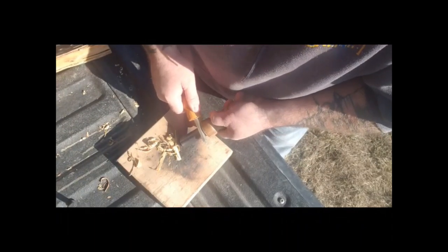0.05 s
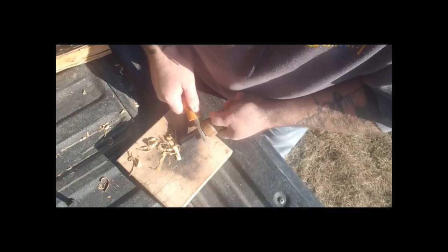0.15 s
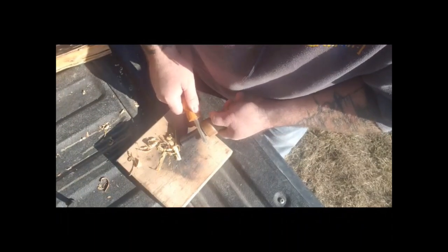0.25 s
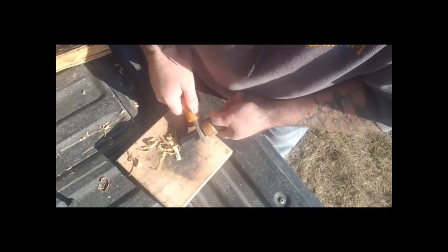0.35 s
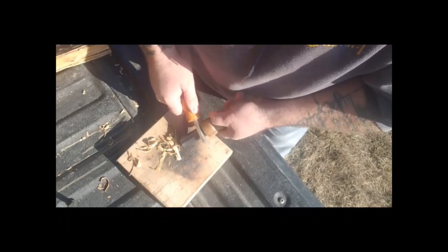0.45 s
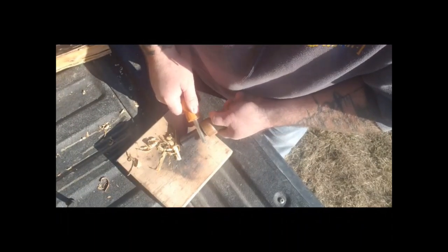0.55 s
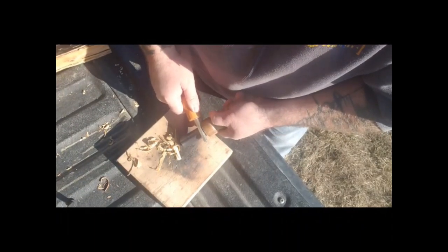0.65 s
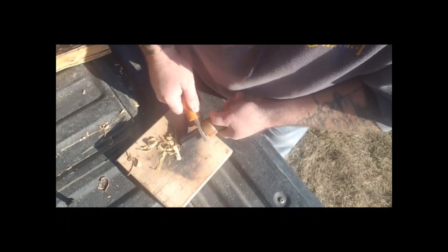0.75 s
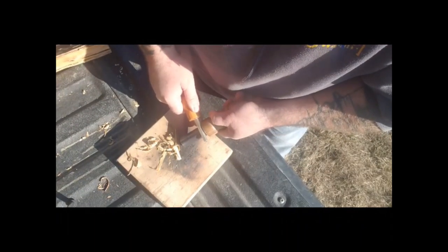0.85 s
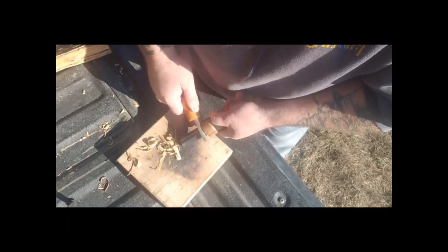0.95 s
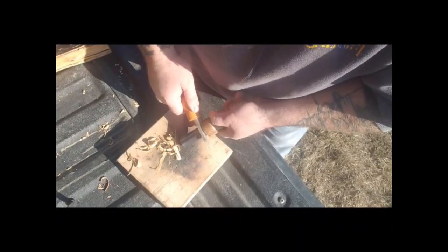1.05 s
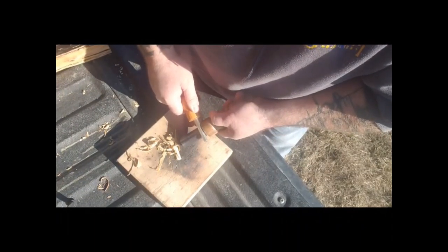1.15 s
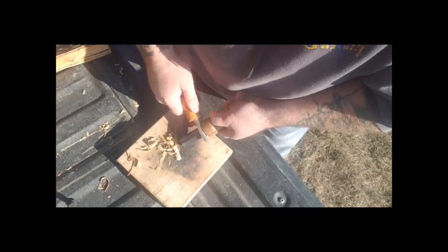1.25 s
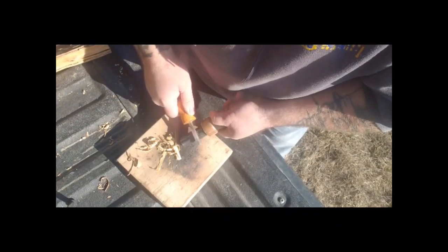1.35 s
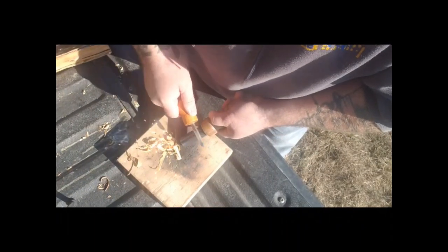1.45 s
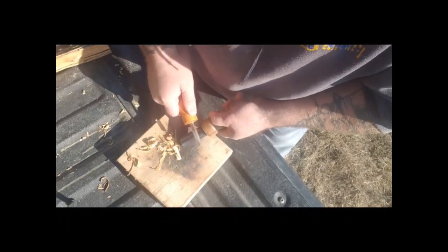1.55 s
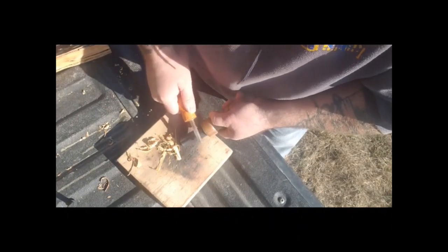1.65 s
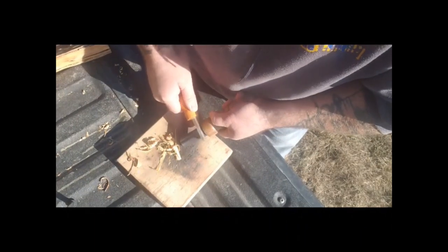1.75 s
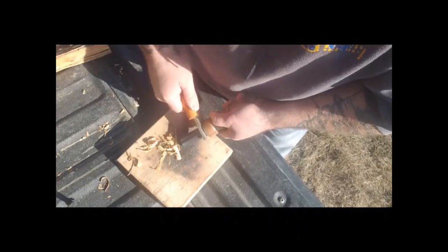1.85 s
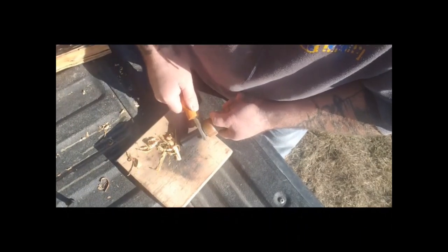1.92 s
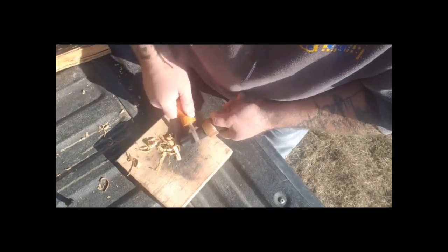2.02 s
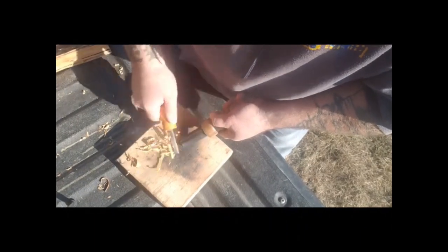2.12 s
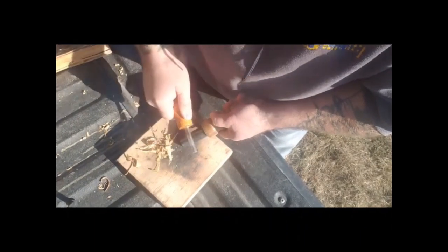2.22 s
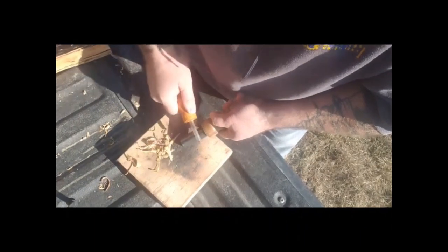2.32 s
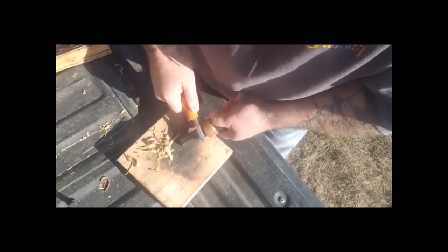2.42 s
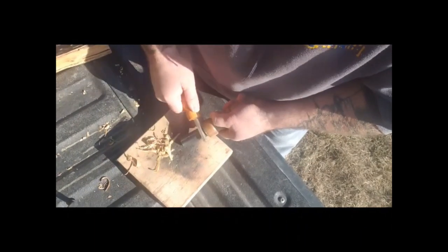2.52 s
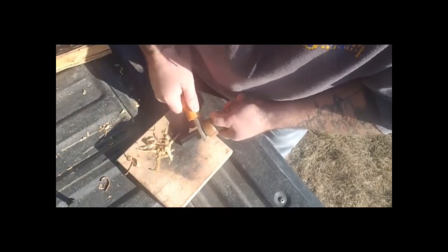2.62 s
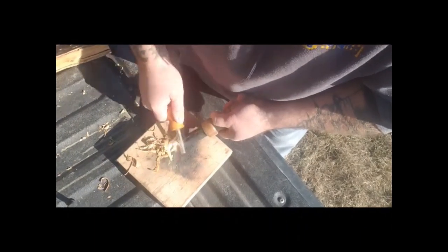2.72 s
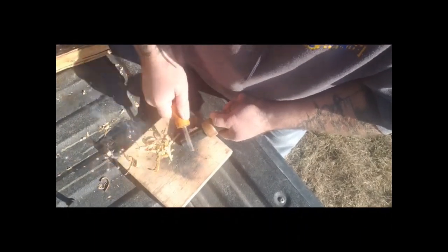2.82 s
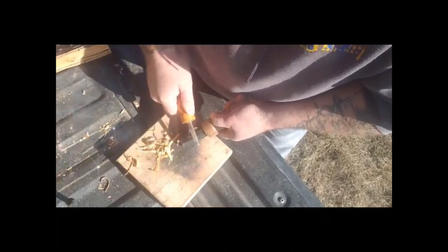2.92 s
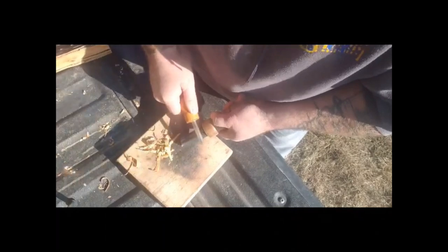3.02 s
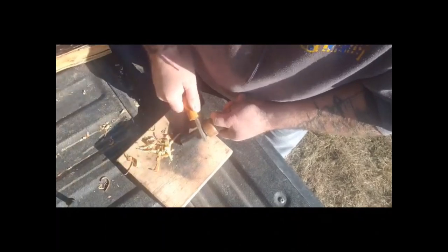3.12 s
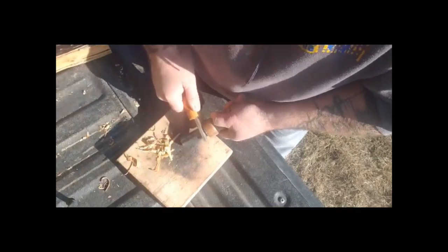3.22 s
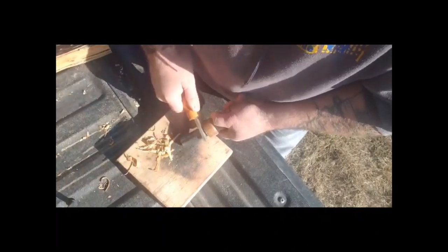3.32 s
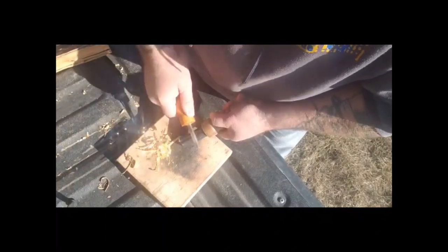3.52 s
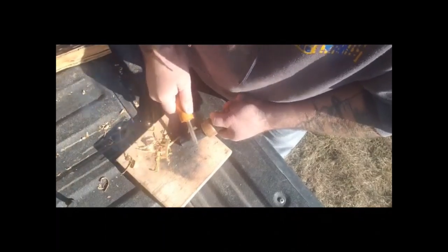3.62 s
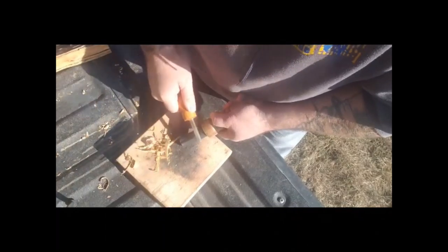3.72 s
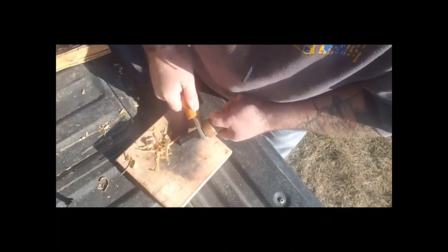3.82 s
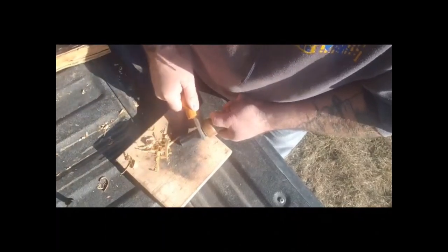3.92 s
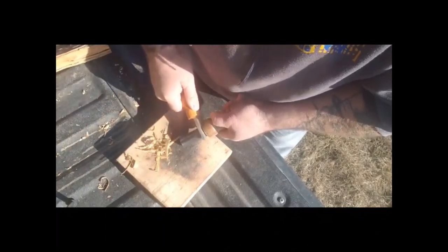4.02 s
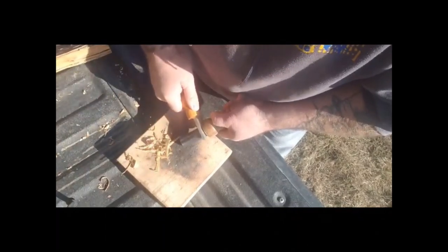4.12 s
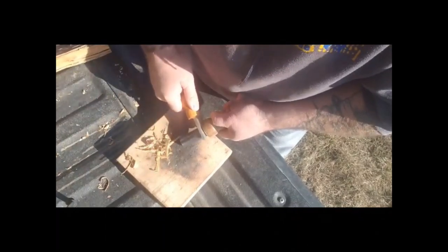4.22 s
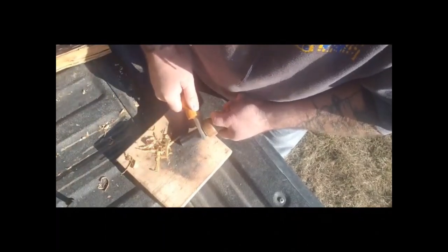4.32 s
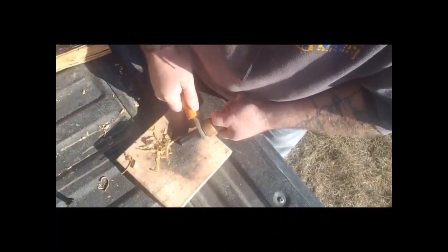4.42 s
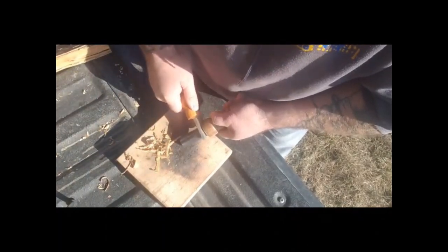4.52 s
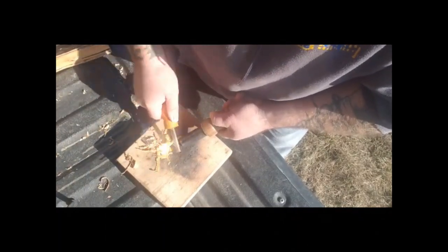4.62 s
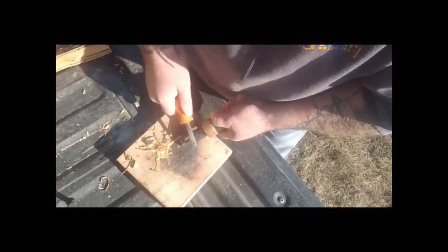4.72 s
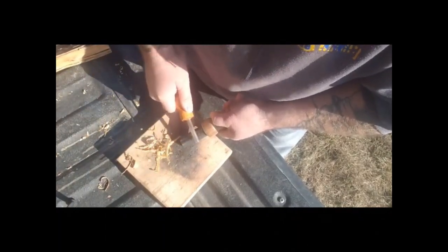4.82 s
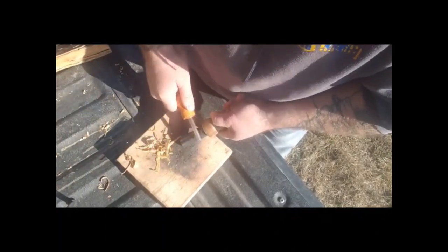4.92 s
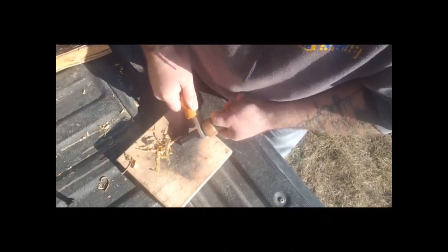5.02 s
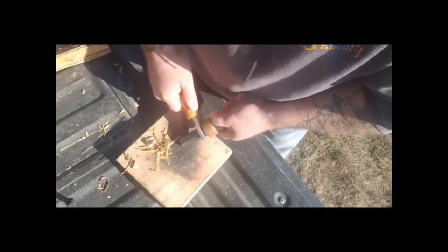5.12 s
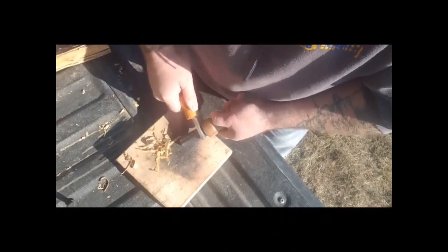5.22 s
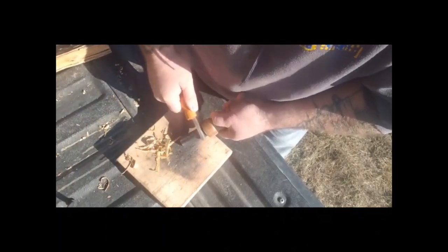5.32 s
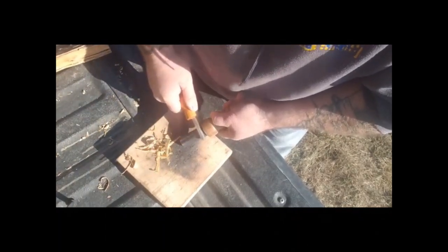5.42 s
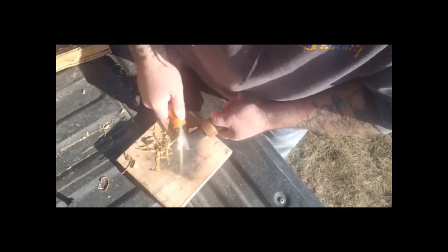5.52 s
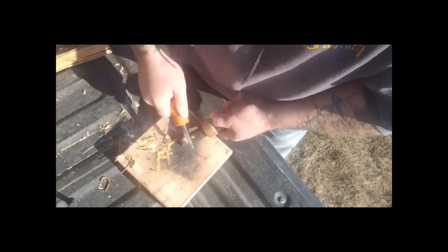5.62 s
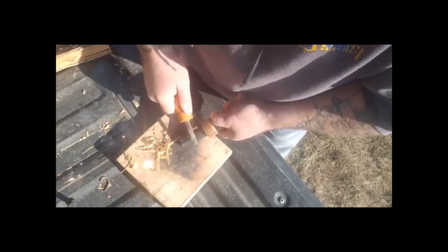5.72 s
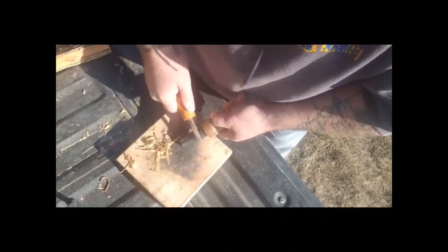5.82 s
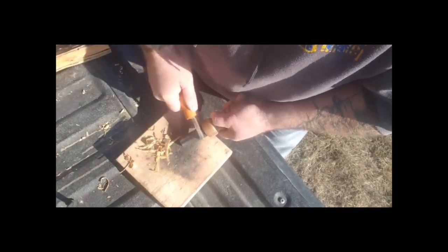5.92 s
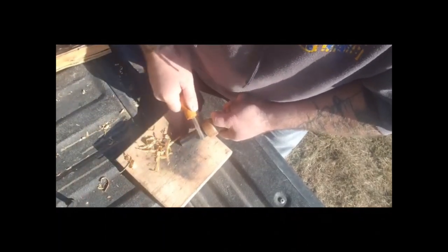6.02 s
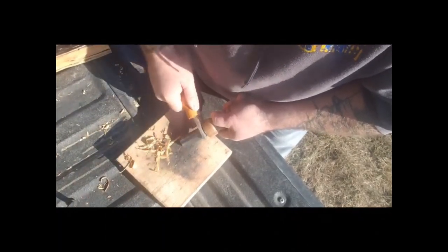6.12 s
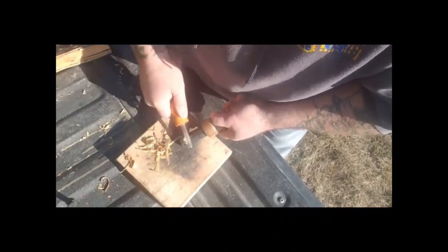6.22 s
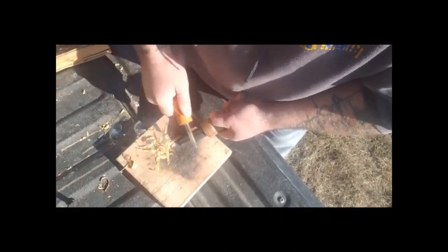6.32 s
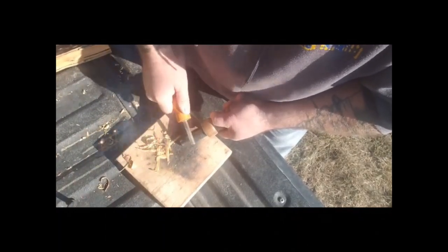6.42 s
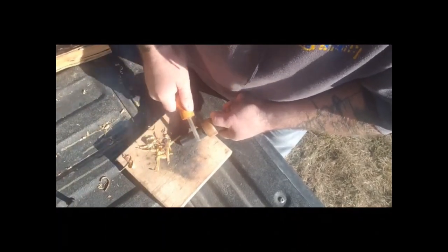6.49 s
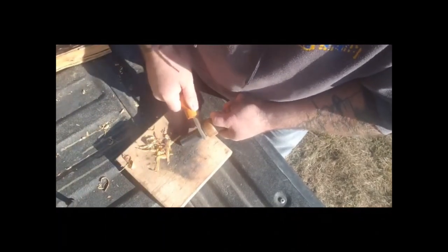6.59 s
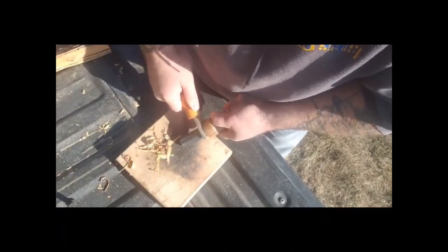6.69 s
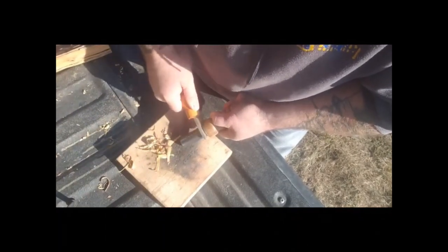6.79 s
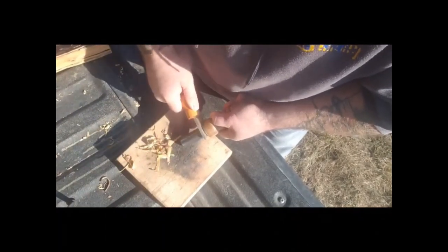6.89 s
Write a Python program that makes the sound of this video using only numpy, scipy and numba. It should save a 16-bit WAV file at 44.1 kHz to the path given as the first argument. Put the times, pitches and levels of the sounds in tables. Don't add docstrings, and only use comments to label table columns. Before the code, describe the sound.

A steel striker rasps down a spark rod in seven short strokes, each with a knock, low boom and fizzing, crackling sparks, outdoors in wind.

```python
import sys
import numpy as np
from scipy import signal
from scipy.fft import rfft, irfft, next_fast_len
from scipy.io import wavfile
from scipy.ndimage import uniform_filter1d, map_coordinates
from numba import njit

SR = 44100
rng = np.random.default_rng(int(sys.argv[2]) if len(sys.argv) > 2 else 0)


def invert_db(level):
    return 10 ** (np.asarray(level, dtype=float) / 20)


def to_wav(sig):
    pcm = np.clip(np.atleast_2d(sig), -1, 1) * 32767
    pcm = np.round(pcm).astype(np.int16)
    wavfile.write(sys.argv[1], SR, pcm.T)


N = 306495
T = np.arange(N) / SR


def unit(x):
    return x / np.sqrt(np.mean(x ** 2))


def played(tables, column, off):
    out = np.full(N, float(off))
    top = np.full(N, -200.)
    for rows in tables:
        rows = np.array(rows)
        rows[:, 0] = np.maximum.accumulate(rows[:, 0])
        on = np.flatnonzero((T >= rows[0, 0]) & (T <= rows[-1, 0] + .03))
        db = np.interp(T[on], rows[:, 0], rows[:, 1])
        leads = db > top[on]
        out[on[leads]] = np.interp(T[on[leads]], rows[:, 0], rows[:, column])
        top[on[leads]] = db[leads]
    return out


def gain(tables):
    return uniform_filter1d(invert_db(played(tables, 1, -200)), size=130)


@njit
def svf(x, hz, width):
    y, b, l = np.empty(len(x)), 0., 0.
    for i in range(len(x)):
        g, k = np.tan(np.pi * hz[i] / SR), width[i] / hz[i]
        v = (b + g * (x[i] - l)) / (1 + g * (g + k))
        b, l, y[i] = 2 * v - b, l + 2 * g * v, k * v
    return y


def band(x, hz, width_hz):
    return svf(x, hz + np.zeros(N), width_hz + np.zeros(N))


def twice(x, hz, width_hz, second_width_hz):
    return unit(band(band(x, hz, width_hz), hz, second_width_hz))


def colour(x, points):
    hz, db = np.transpose(points)
    size = next_fast_len(N, True)
    f = np.maximum(np.fft.rfftfreq(size, 1 / SR), 1)
    return irfft(rfft(x, size) * invert_db(np.interp(np.log(f), np.log(hz), db)), size)[:N]


def ring(x, modes):
    out = 0
    for hz, db, t60 in modes:
        pole = np.exp(2j * np.pi * hz / SR - np.log(1000) / (t60 * SR))
        out = out + invert_db(db) * signal.lfilter([1], [1, -pole], x).imag
    return out


def walk(rate):
    k = int(SR / rate)
    held = np.repeat(rng.standard_normal(N // k + 1), k)
    return unit(uniform_filter1d(uniform_filter1d(held, k), k)[:N])


def grit(rate, spread_db):
    chance = rng.random((3, N))
    sign = np.sign(chance[1] - .5)
    return (chance[0] < rate / SR) * sign * invert_db(-spread_db * np.log(1 - chance[2]))


def bursts(times, peaks_db, t60s):
    out = np.zeros(N)
    for s, db, t60 in zip(times, peaks_db, t60s):
        i = int(s * SR)
        tail = T[:min(N - i, SR // 4)]
        out[i:i + len(tail)] += invert_db(db - 60 * tail / max(t60, .002))
    return out


def ports(x, other, alike, lag, pan_db):
    alike = np.clip(alike, 0, 1)
    late = map_coordinates(x, [np.arange(N) - lag], order=3, mode="nearest")
    right = alike * x + np.sqrt(1 - alike ** 2) * other
    return np.array([late * invert_db(pan_db / 2), right * invert_db(-pan_db / 2)])


CALM_DB = -84
# start in seconds, rumble in dB, length in seconds, flutter against the
# rumble in dB, left minus right in dB.
GUSTS = [(0.0, -63.5, 1, -10, -25), (0.155, -43.5, 0.52, -11.5, -15.5), (0.408, -35, 0.15, -16, 0),
         (0.585, -40.5, 0.34, -14, 6.5), (0.787, -37, 0.073, -10, -1), (0.891, -54, 0.12, -5, -21),
         (1.085, -36, 0.081, -12, 2), (1.19, -49.5, 0.2, -3.5, -8.5), (1.783, -64.5, 0.23, -8, -23),
         (1.904, -48, 0.13, -7.5, -10), (2.435, -57.5, 0.13, -4.5, -23), (2.578, -48, 0.099, -27, -21),
         (3.053, -76, 0.28, -5, -27), (3.337, -49, 0.061, -13, -4.5), (3.442, -58.5, 0.098, -19, -24),
         (3.83, -55.5, 0.26, -11.5, -5.5), (4.257, -59, 0.17, -11, 2), (4.442, -49.5, 0.12, -12, -11.5),
         (4.942, -58, 0.25, -6.5, -7), (5.307, -67, 0.17, 0, -3), (5.91, -52, 0.078, -26, 0),
         (6.044, -56.5, 0.32, -7.5, -1), (6.497, -50, 0.21, -16, 2), (6.645, -47.5, 0.28, -28, 1)]


def gusts():
    rise_s, fade_db, lull_s, lull_db = 0.014, -12, 0.031, -25.5
    out = []
    for at, db, length, flutter, pan in GUSTS:
        shape = [(at - rise_s, lull_db), (at, 0), (at + length, fade_db), (at + length + lull_s, lull_db)]
        out.append([(s, db + step, db + step + flutter, pan) for s, step in shape])
    return out


def shudder(events, fall_db_per_s):
    return gain([[(s - .05, db - 29.0), (s, db), (s + 0.3, db - .3 * fall_db_per_s)] for s, db in events])


# frequency in Hz, level in dB.
RUMBLE = [(20, -13), (40, -3.5), (65, -2.5), (100, -7), (150, -12), (300, -36.5), (1000, -99)]
# frequency in Hz, level in dB.
FLUTTER = [(90, -19.5), (150, -5.5), (300, -2.5), (450, -6), (600, -21), (900, -41), (2000, -74)]
# start in seconds, peak in dB, frequency in Hz.
BUFFETS = [(0.031, -38.5, 68), (0.149, -32, 89.5), (0.395, -21, 60), (0.788, -31, 70.0), (1.09, -45, 51.2),
           (1.911, -37, 84), (2.232, -24, 75), (2.441, -37, 84), (3.353, -41.5, 72.5), (3.587, -23, 93),
           (4.451, -44.5, 81.8), (4.708, -33, 117), (5.677, -26, 88.8), (6.364, -38, 118)]


def wind():
    blowing = gain(gusts()) + invert_db(CALM_DB)
    thud = shudder([(s + 0.037, db) for s, _, _, _, db in SHAKES], 129)
    jolted = [(s, db - 3) for s, db, *_ in SHAKES]
    ticked = [(s + 0.016, db - 11) for s, db, *_ in TICKS]
    rattle = shudder(jolted + ticked, 169)
    fluttering = uniform_filter1d(invert_db(played(gusts(), 2, CALM_DB)), size=130) + rattle
    lumps = invert_db(2.5 * walk(45))

    def eddies():
        rumble = unit(lumps * colour(rng.standard_normal(N), RUMBLE))
        flutter = unit(colour(lumps * invert_db(0.59 * walk(45)) * rng.standard_normal(N), FLUTTER))
        return (blowing + thud) * rumble + invert_db(-4.5) * fluttering * flutter

    thumps = np.zeros(N)
    for at, db, hz in BUFFETS:
        phase = (T - at - .023) * hz
        thumps += invert_db(db - 1.0) * np.exp(-(phase / 0.41) ** 2) * np.sin(2 * np.pi * phase + 0.6)
    shaken = (thud + rattle) / (thud + rattle + blowing)
    pan_db = uniform_filter1d(played(gusts(), 3, -6.0), size=1300) * (1 - shaken)
    alike = 0.45 + 0.23 * shaken
    return ports(eddies() + thumps, eddies() + 0.083 * thumps, alike, lag=0, pan_db=pan_db)


# frequency in Hz, level in dB.
HISS = [(290, -34.5), (500, -5), (631, -3), (1160, -10.5), (1340, -9), (4530, -15), (7750, -25),
        (14000, -12.5), (16000, -20.5)]


def air():
    return invert_db(-77) * np.array([unit(colour(rng.standard_normal(N), HISS)) for _ in range(2)])


# start in seconds, peak in dB, board knock and high ring against it in dB.
TICKS = [
    (1.8749, -42, -5.5, -48),
    (2.5665, -41.5, -5, -7.5),
    (3.204, -35.5, -10, -8),
    (3.916, -40.5, -3, -3.5),
    (5.1207, -47, -2.5, -1.5),
    (5.985, -46, 2, -3.5),
    (6.7035, -37, -13, -9.5),
]
# centre in seconds, level in dB, half length in seconds.
RUBS = [
    (0.373, -67.5, 0.051),
    (0.75, -55, 0.018),
]
# frequency in Hz, level in dB, t60 in seconds.
STEEL = [(1703, 13.5, 0.018), (2380, -15, 0.049), (2742, -2, 0.044), (1880, 15, 0.0032),
         (3940, -0.5, 0.008), (5450, -11, 0.0088), (6580, -1.5, 0.0026), (8300, -13, .006)]
# frequency in Hz, level in dB, t60 in seconds.
WOOD = [(354, -12.5, 0.48), (590, 9.5, 0.021), (880, 17, 0.018), (940, -15, 0.047)]
# frequency in Hz, level in dB.
SCUFF = [(200, -36), (400, 17), (1100, 5), (1400, -16), (1800, -6), (2250, -3), (2400, 2), (2600, -8),
         (5200, -23), (16000, -53)]


def ticks():
    steel, hard, wood = np.zeros((3, N))
    for s, db, wood_db, hard_db in TICKS:
        double = int(s * SR) + np.array([34, 82])
        steel[double] += invert_db(db) * np.array([-.9, -1])
        hard[double] += invert_db(db + hard_db) * np.array([-1, -.3])
        wood[double] += invert_db(db + wood_db) * np.array([.3, -1])
    s, db, wood_db, _ = np.transpose(TICKS)
    fading = bursts(s + 0.0028, db + 0.36 * wood_db - 0.5, 0.16 + 0 * s)
    fading = fading + sum(invert_db(db) * np.exp(-((T - s) / half) ** 2) for s, db, half in RUBS)
    scuff = [fading * unit(colour(grit(2500, 1.5), SCUFF)) for _ in range(2)]
    tap = invert_db(-11.5) * ring(uniform_filter1d(steel, size=6), STEEL[:4])
    tap = tap + invert_db(6.5) * ring(hard, STEEL[4:])
    tap = tap + invert_db(-8.0) * ring(wood, WOOD)
    echo = np.roll(tap, 15)
    return ports(tap + .3 * echo + scuff[0], echo + scuff[1], alike=0.75, lag=.5, pan_db=.5)


# start in seconds, peak in dB, frequency in
# Hz, t60 in seconds.
CATCHES = [(0.743, -56.5, 2370, 0.097), (2.167, -30.5, 990, 0.2), (3.06, -55, 456, 0.21),
           (3.135, -57.5, 426, 0.15), (3.525, -26.5, 1020, 0.12), (4.69, -30.5, 995, 0.13),
           (1.437, -49, 800, 0.04), (1.455, -41, 835, 0.065), (1.472, -33, 1016, 0.079),
           (1.51, -36, 1057, 0.099), (1.537, -35, 1610, 0.051), (1.575, -42.5, 1590, 0.045),
           (2.079, -44, 833, 0.08), (2.104, -38.5, 813, 0.11), (2.119, -46.5, 894, 0.051),
           (2.134, -38.5, 930, 0.036), (2.156, -29, 870, 0.21), (2.188, -42.5, 2380, 0.18),
           (2.205, -32.5, 460, 0.087), (2.81, -29, 940, 0.078), (2.84, -46, 4700, 0.02),
           (2.862, -38.5, 2740, 0.074), (2.964, -38.5, 413, 0.078), (3.2, -49, 805, 0.024),
           (3.204, -34.5, 5390, 0.02), (3.207, -40, 2384, 0.083), (2.569, -50.5, 2400, 0.1),
           (3.919, -54, 2520, 0.11), (1.877, -62, 2360, 0.066), (6.706, -47, 2380, 0.1),
           (3.504, -33.5, 916, 0.064), (3.516, -30, 873, 0.066), (3.527, -40.5, 2950, 0.026),
           (3.544, -31, 4800, 0.036), (3.554, -34.5, 4800, 0.021), (3.576, -39.5, 1600, 0.24),
           (4.645, -54, 900, 0.06), (4.666, -28.5, 870, 0.088), (4.695, -35, 2403, 0.14),
           (4.701, -39, 4600, .04), (4.712, -33.5, 790, 0.041), (4.737, -40, 1636, 0.24),
           (5.608, -36, 802, .06), (5.616, -31, 849.5, 0.063), (5.645, -37, 4370, 0.042),
           (6.302, -47, 816, 0.072), (6.319, -34.5, 900, .08), (6.351, -32, 4420, 0.045),
           (6.36, -33.5, 1634, 0.063)]


def catches():
    out = np.zeros((2, N))
    waver = np.array([walk(300), walk(300)])
    for s, db, hz, t60 in CATCHES:
        i = int(s * SR)
        t = T[:min(N - i, SR // 5)]
        swing = np.sin(2 * np.pi * hz * t + 1.9 * waver[:, i:i + len(t)])
        out[:, i:i + len(t)] += invert_db(db - 60 * t / max(t60, .005)) * np.minimum(t / 0.0011, 1) * swing
    return ports(*out, alike=0.91, lag=1.0, pan_db=0.9)


# hardest bite in seconds, chatter in dB, chatter pitch in Hz, build-up in
# seconds, hold in seconds.
STROKES = [
    (1.496, -27, 591.2, .056, .02),
    (2.178, -24, 720, 0.099, 0.011),
    (2.817, -18, 859.6, .036, .015),
    (3.53, -17.5, 880, .04, 0.013),
    (4.694, -19, 930, .048, .009),
    (5.635, -17, 860, 0.029, 0.0072),
    (6.337, -16, 880, .036, 0.009),
]
GRIPS_DB = [-10.5, -15.5, -31, -20, -17, -13, -17.5]


def strokes():
    touch_db, touch_s, grip_s, creep_pitch = -35.5, .012, .01249, .9
    hold_pitch, let_go_s, slip_s, run_out_s = .88, .00699, .035, .04
    out = []
    for (s, db, hz, rise, hold), grip in zip(STROKES, GRIPS_DB):
        lighter = 1.9 * (-19.5 - db)
        creep, held = hz * creep_pitch, hz * hold_pitch
        end = s + hold
        out.append([(s - rise - touch_s, db + touch_db - 19.5, creep, 0),
                    (s - rise, db + touch_db, creep, 0),
                    (s - grip_s, db + grip, creep, 4.5 + lighter / 2),
                    (s, db, hz, -9 + lighter),
                    (end, db - 2.5, held, -2.5),
                    (end + let_go_s, db - 11.5, held, 2),
                    (end + slip_s, db - 19.5, hz * .66, 2),
                    (end + slip_s + run_out_s, db - 34, hz * .61, 2)])
    return out


# frequency in Hz, width in Hz, level in dB.
BLADE = [(1370, 630, -31.5), (1600, 15, -25.5), (2470, 140, -37.5), (2770, 180, -31.5), (4800, 530, -33)]


def chatter():
    hz = np.clip(played(strokes(), 2, 1100), 200, 2000)
    force = gain(strokes())
    phase = 2 * np.pi * np.cumsum(hz * (1 + .06 * walk(250))) / SR
    judder = np.sin(phase) * invert_db(.7 * walk(170))

    def edge():
        slips = unit(grit(1200, 0.61))
        loose = twice(slips, hz, 0.13 * hz, 0.064 * hz)
        blade = sum(invert_db(db) * twice(slips, f, w, 3 * w) for f, w, db in BLADE)
        rod = twice(slips, 935, 230.0, 270.0) * invert_db(played(strokes(), 3, -26.5) - 10.0)
        plank = twice(slips, 570., 84.0, 160.0) * invert_db(-6.0)
        return .16 * loose + blade + rod + plank

    return force * ports(.9 * unit(judder) + edge(), 1.5 * edge(), alike=.89, lag=1.5, pan_db=.3)


# time in seconds, fizz in dB, fine hiss against it in dB.
SHOWERS = [
    [(1.44, -77, -11), (1.458, -57.5, -12), (1.47, -55.5, 1), (1.482, -49, -1.5), (1.502, -47.5, 3.5),
     (1.544, -48, 3), (1.6, -59, 2)],
    [(2.14, -56, 4), (2.144, -52, 7), (2.192, -41, 1.5), (2.22, -51, 1.5)],
    [(2.258, -61, 8), (2.264, -47, 13.5), (2.278, -42.5, 5.5), (2.294, -52, 4.5), (2.324, -52.5, 4),
     (2.34, -63.5, -7)],
    [(2.77, -73.5, 8.5), (2.808, -64.5, 11.5), (2.826, -45, 3), (2.872, -44.5, 3), (2.882, -49, 3),
     (2.964, -50.5, 9.5), (2.995, -60.5, 2)],
    [(3.485, -77.5, 4.5), (3.505, -52, 7), (3.549, -43, 4), (3.559, -43, 5.5), (3.7, -60, 1.5)],
    [(4.64, -84, 3.5), (4.666, -55.5, 7.5), (4.69, -51.5, 9), (4.702, -47, 0), (4.708, -46, 4),
     (4.784, -51.5, 8), (4.82, -56, 6)],
    [(5.595, -75.5, -4.5), (5.619, -53.5, 10), (5.643, -41.5, 3), (5.703, -49.5, 5), (5.799, -54.5, 7.5),
     (5.843, -49, 1), (5.87, -61.5, 2)],
    [(6.295, -69.5, 2.5), (6.321, -56, 8.5), (6.353, -42.5, 6), (6.373, -47, 2.5), (6.46, -59.5, 4)],
]
# start in seconds, fizz in dB, fade in dB/s, dying moment in seconds, fine
# hiss against the fizz in dB.
EMBERS = [(1.59, -61, 60, 1.69, 4), (2.104, -61, -130, 2.14, 2), (2.144, -50, 0, 2.17, 6),
          (2.22, -58, 200, 2.255, 2), (2.34, -66, 170, 2.39, 5), (2.39, -78, 0, 2.45, 9),
          (2.98, -62, 45, 3.17, 5), (3.17, -67, 0, 3.24, 6), (3.25, -72, -40, 3.345, 7),
          (3.69, -62, 55, 3.81, 4), (3.8, -71, 50, 3.92, 7), (3.925, -68, 150, 3.97, 0),
          (3.965, -77, 10, 4.14, 8), (4.186, -67, 130, 4.25, 9), (4.77, -52, 160, 4.88, 4),
          (4.87, -70, 20, 4.93, 5), (4.935, -68, 10, 5.06, 6), (5.07, -62, 100, 5.09, 6),
          (5.1, -69, 120, 5.16, 3), (5.16, -79, 10, 5.26, 9), (5.26, -86, 30, 5.35, 10),
          (5.35, -88, -50, 5.45, 14), (5.855, -60, 150, 5.95, 4), (5.95, -72, 0, 5.99, 8),
          (6.0, -68, 150, 6.05, 5), (6.05, -73, -10, 6.15, 8), (6.15, -75, 60, 6.25, 9),
          (6.45, -63, 20, 6.53, 3), (6.53, -72, 10, 6.69, 7), (6.698, -64, 40, 6.78, 4)]


def burning():
    douse_s, kindle_s, die_s, die_db = .03, .005, .06, -20
    out = []
    for rows in SHOWERS:
        curve = [(s, db + 0.73, 1.1 * (fine - 1.5)) for s, db, fine in rows]
        s, db, fine = curve[-1]
        out.append(curve + [(s + douse_s, db + die_db, fine)])
    for s, db, rate, end, fine in EMBERS:
        last_db = db - rate * (end - s)
        out.append([(s - kindle_s, db - 8.5, fine), (s, db, fine), (end, last_db, fine),
                    (end + die_s, last_db + die_db, fine)])
    return out


THROWN_TO = [3, 2, 4, 7, 3.2, 2.4, 3.2, 2.4]


def flight():
    paths = [[(rows[0][0], 0, .5), (rows[-1][0], 0, lag)] for rows, lag in zip(SHOWERS, THROWN_TO)]
    return uniform_filter1d(played(paths, 2, 2.4), size=900)


# frequency in Hz, level in dB.
FIZZ = [(450, -35), (800, -6.5), (1600, -3), (2600, -4.5), (3700, -5.5), (6900, -7.5), (9500, -7.5),
        (12500, -5), (15500, -5.5), (17000, -5)]
# start in seconds, peak in dB, lower part against it in dB, t60 in seconds.
POPS = [(1.623, -32.5, -24, 0.027), (1.6542, -47.5, -3, 0.023), (2.082, -52, -8, 0.055),
        (2.1032, -53, -10, 0.04), (2.144, -36, -24, 0.041), (2.266, -25, -6.5, 0.13),
        (2.2764, -21.5, -0.5, 0.032), (2.3047, -51, -20, 0.053), (2.32, -41, 6.5, 0.035),
        (2.3581, -48, -11, 0.028), (2.412, -51, -28, 0.064), (2.444, -59, -36.5, 0.057),
        (4.1864, -38, -29.5, 0.029), (4.8614, -47, -16, 0.025), (4.9063, -55, -14, 0.012),
        (4.988, -47, -1.5, 0.038), (5.047, -45, -23, 0.022), (5.075, -40, -8, 0.077), (5.158, -56, -6, .03),
        (5.236, -64.5, -14.5, 0.053), (5.9634, -36.5, -35.5, 0.082), (6.087, -43, -31, 0.036),
        (6.1353, -41, -23, 0.029), (6.496, -56, 10, 0.069), (6.5173, -53, 8.5, 0.2),
        (6.574, -51, -20, 0.024), (6.614, -43.5, 4.5, 0.016), (6.665, -51, 0, 0.038)]
# start in
# seconds, # peak in dB, lower part against it in dB, t60 in seconds.
MORE_POPS = [(2.8404, -24.5, -4, 0.025), (2.8544, -30, -9, 0.025), (3.0225, -45, -16, 0.025),
             (3.7452, -39, 5, 0.028), (3.835, -43.5, -11, 0.017), (3.876, -42, -8, 0.025),
             (3.9744, -60, -9, 0.025), (3.9833, -50, -14.5, 0.029), (4.0781, -52, -17, 0.025),
             (4.093, -46.5, -15, 0.025), (4.121, -54, -16, 0.025), (4.151, -54, -8.5, 0.025),
             (4.2438, -58, -12, 0.021), (5.7442, -36, -17, 0.025), (5.762, -32, -1, 0.025),
             (5.7693, -35, -14, 0.025), (5.8199, -32, -11, 0.025), (5.8427, -32.5, -2.5, 0.023),
             (5.9344, -51.5, -14, 0.025)]


def sparks():
    fine_db = uniform_filter1d(played(burning(), 2, 0), size=400) - .4
    glow = gain(burning()) * invert_db(7.9 + .3 * walk(70) + 1.4 * walk(300))
    centres = 900 * 2 ** np.arange(0, 4.3, .5)
    patches = [invert_db(1.2 * walk(30) + 2.2 * walk(150)) for _ in centres]

    def burn():
        out = 0
        crackle = colour(rng.standard_normal(N) + .5 * unit(grit(2700, 2.2)), FIZZ)
        for hz, patch in zip(centres, patches):
            skirts = [(hz / 2, -40), (hz / 1.35, -6), (hz, 0), (hz * 1.35, -6), (hz * 2, -40)]
            fine = invert_db(fine_db * np.clip(np.log2(hz / 5500), 0, 1))
            out = out + patch * colour(crackle, skirts) * fine
        for lag, share in ((37, 0.3), (95, 0.45)):
            heard = np.arange(N) - lag * (1 + 0.077 * walk(12))
            out = out + share * np.interp(heard, np.arange(N), out)
        return glow * out

    cracks = [(s, db - 1.5, low_db, t60) for s, db, low_db, t60 in MORE_POPS]
    s, db, low_db, t60 = np.transpose(list(POPS) + cracks)

    def pop(peak_db):
        return bursts(s, peak_db, 0.074 * t60) + bursts(s, peak_db - 11.0, t60)

    high, low = pop(db + 0.45), pop(db + low_db + 0.5)
    popping = [high * unit(band(x, 11400.0, 14000.0)) + low * unit(band(x, 1700.0, 4500.))
               for x in rng.standard_normal((2, N))]
    fizz = ports(burn(), burn(), alike=0.38, lag=flight(), pan_db=-0.54)
    return fizz + ports(*popping, alike=0.58, lag=3.35, pan_db=0.0)


# start in seconds, board in dB, later boom of the bed against it in dB,
# ring-out in seconds, thud in the ports in dB.
SHAKES = [(1.507, -37, 0.5, 0.22, -55.5), (2.1, -49.5, 11, 0.091, -63.5), (2.189, -33, 2.5, 0.11, -50.5),
          (2.258, -36.5, 7.5, 0.1, -39.5), (2.841, -35, 1, 0.29, -65.5), (2.974, -59, -12, 0.22, -78),
          (3.549, -32, 4.5, 0.078, -46.5), (3.586, -30, 4, 0.31, -36.5), (4.07, -72.5, -10, 0.13, -85.5),
          (4.711, -34.5, 7, 0.33, -38.5), (5.34, -76, 8.5, 0.051, -81), (6.119, -62.5, -10, 0.44, -81),
          (5.656, -29.5, 6, 0.45, -32), (6.366, -28, 8.5, 0.33, -31)]


def shakes():
    still_db = -77
    return [[(s - 0.048, db - 26, -3),
             (s, db, boom - 13.5),
             (s + 0.046, db + 0.33 * (still_db - db), boom),
             (s + ring_out, still_db, boom)] for s, db, boom, ring_out, _ in SHAKES]


# frequency in Hz, width in Hz, level in dB.
BED = [(89.5, 34, -2.5), (160, 14, 0), (244, 40, -16), (342.6, 55, -6), (400, 110, -1)]


def board():
    deep = invert_db(played(shakes(), 2, 0))
    soft = signal.butter(3, 520, fs=SR, output="sos")

    def boom():
        jolts = signal.sosfilt(soft, grit(500, 1.6))
        rings = [invert_db(db) * twice(jolts, hz, w, 3 * w) for hz, w, db in BED]
        return gain(shakes()) * (deep * unit(sum(rings[:2])) + unit(sum(rings[2:])))

    return ports(boom(), boom(), alike=0.82, lag=0.96, pan_db=-2.0)


# centre in seconds, peak in dB, frequency
# in Hz, length in cycles.
KNOCKS = [(2.198, -23, 520, 0.76), (2.207, -26, 420, 0.71), (2.851, -30.5, 600, 0.64),
          (3.546, -18, 900, 1.4), (3.564, -19.5, 520, .6), (4.715, -22.5, 523, 0.86),
          (2.245, -28.5, 129.6, 1.1), (2.84, -22.5, 550, 1.1), (3.556, -12, 624, 0.66),
          (3.59, -23.5, 162, 2.64), (4.187, -54.5, 400, 0.83), (4.76, -35.5, 160, 3.09),
          (5.647, -22, 760, 0.68), (5.6583, -14, 627, 0.6), (5.694, -24.5, 154, 2.4),
          (6.3514, -13, 710, 0.68), (6.361, -10.5, 614, 0.97), (6.395, -24.5, 151, 2.3)]


def knocks():
    knock = np.zeros(N)
    for s, db, hz, cycles in KNOCKS:
        swell = np.exp(-((T - s) * hz / cycles) ** 2)
        knock += invert_db(db) * swell * np.cos(2 * np.pi * hz * (T - s))
    return ports(knock, 0 * knock, alike=0.91, lag=4.2, pan_db=0.5)


def scene():
    return wind() + air() + ticks() + catches() + chatter() + sparks() + board() + knocks()


def low_pass(x):
    return signal.sosfilt(signal.butter(12, 16800, fs=SR, output="sos"), x)


def record(dry):
    cut = signal.sosfilt(signal.butter(3, 38, "high", fs=SR, output="sos"), dry)
    cut = signal.sosfilt(signal.ellip(10, .2, 55, 15700, fs=SR, output="sos"), cut)
    return low_pass(cut)


dry = scene()
out = record(dry)
to_wav(out)
```